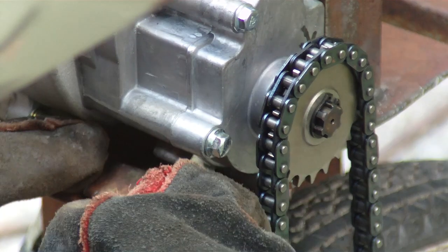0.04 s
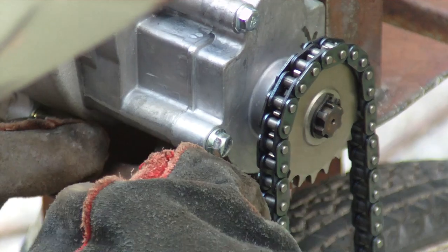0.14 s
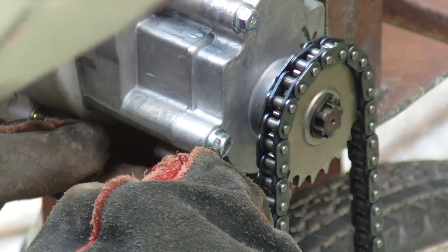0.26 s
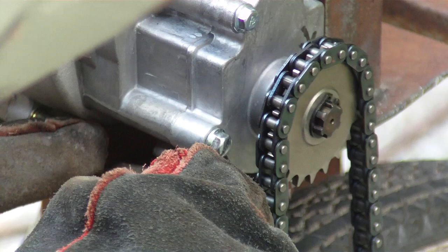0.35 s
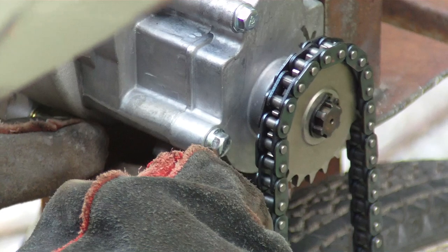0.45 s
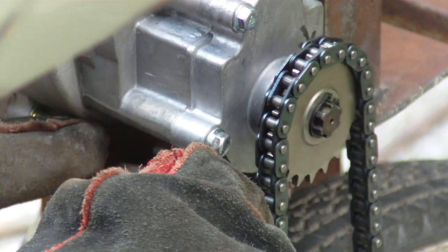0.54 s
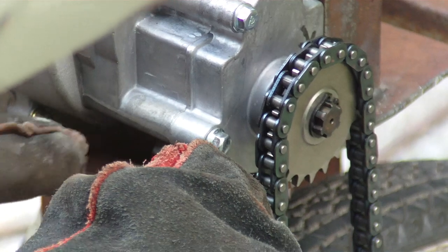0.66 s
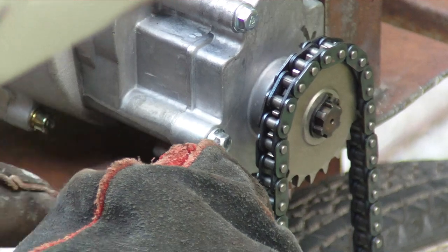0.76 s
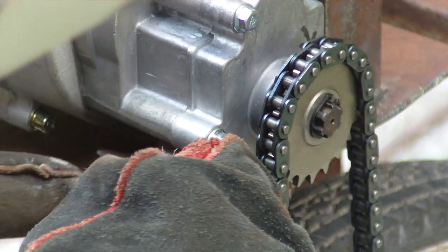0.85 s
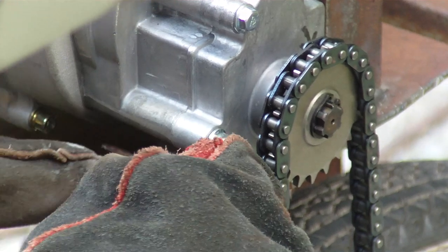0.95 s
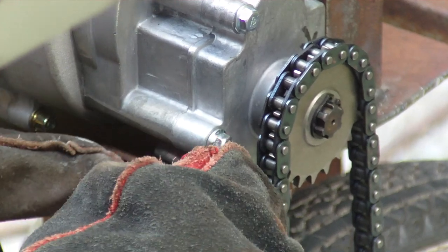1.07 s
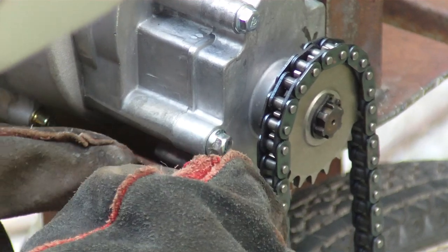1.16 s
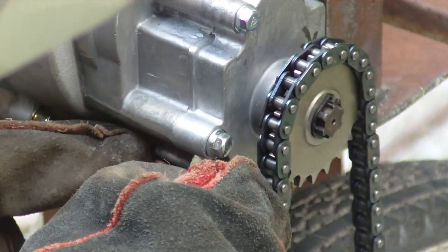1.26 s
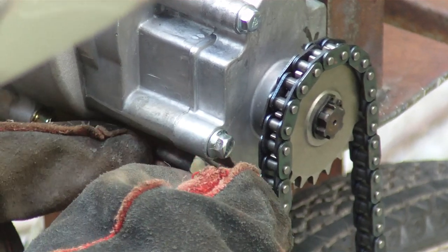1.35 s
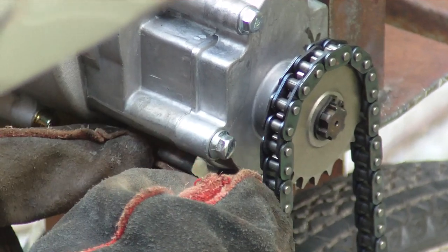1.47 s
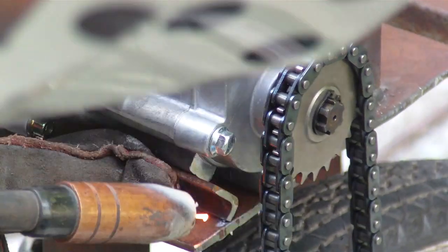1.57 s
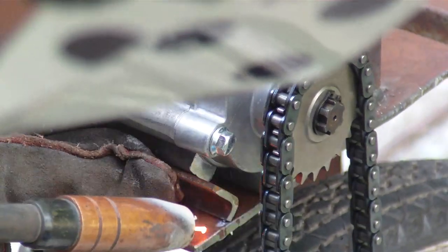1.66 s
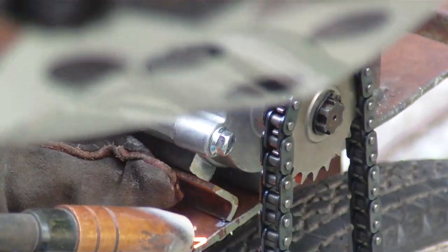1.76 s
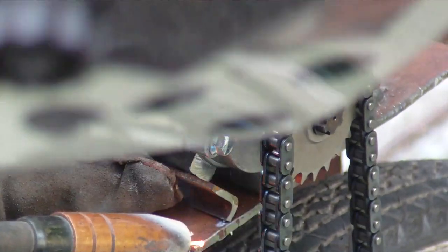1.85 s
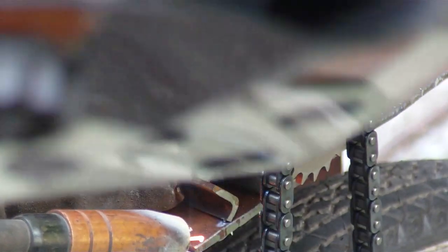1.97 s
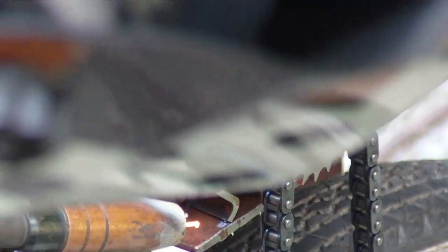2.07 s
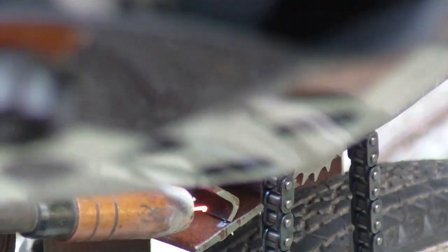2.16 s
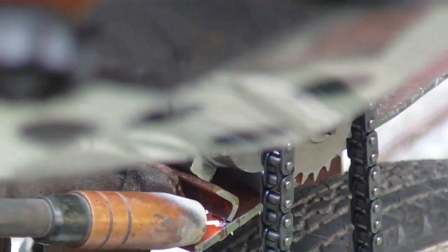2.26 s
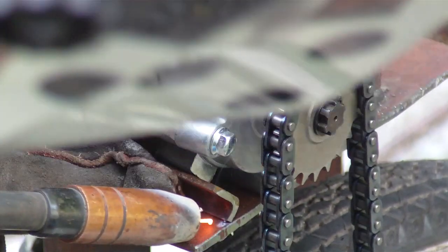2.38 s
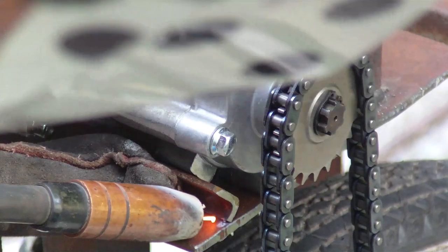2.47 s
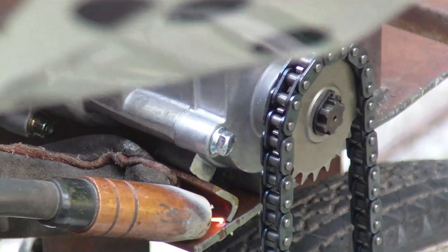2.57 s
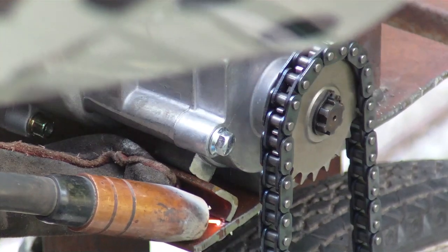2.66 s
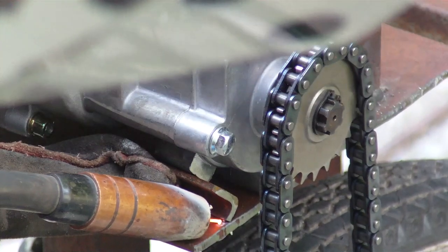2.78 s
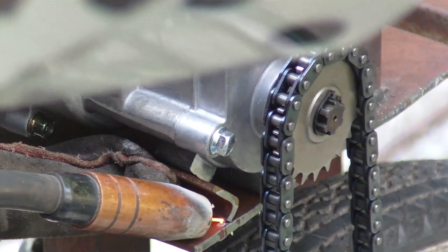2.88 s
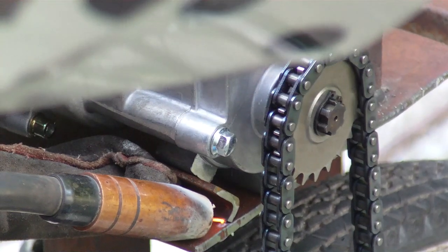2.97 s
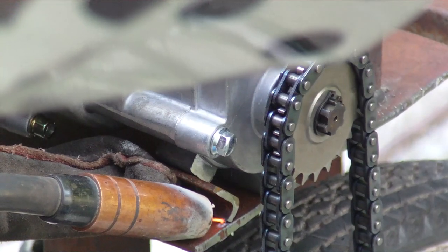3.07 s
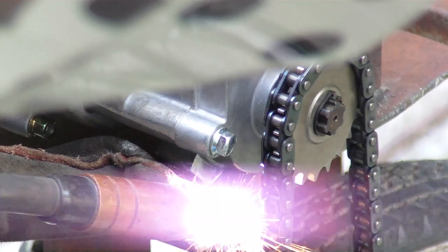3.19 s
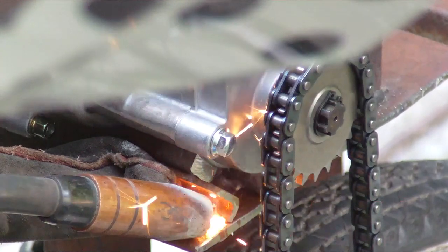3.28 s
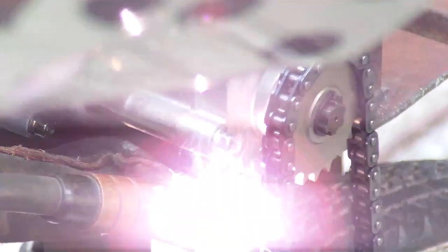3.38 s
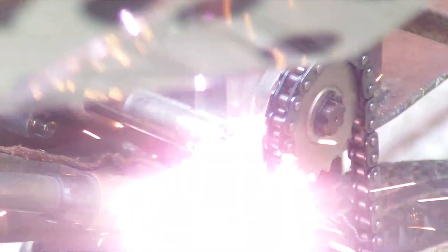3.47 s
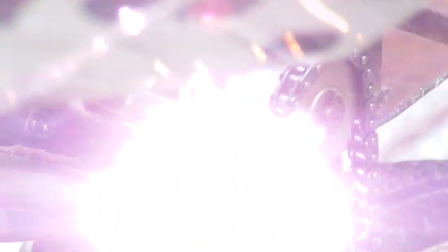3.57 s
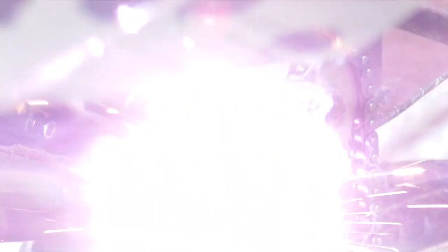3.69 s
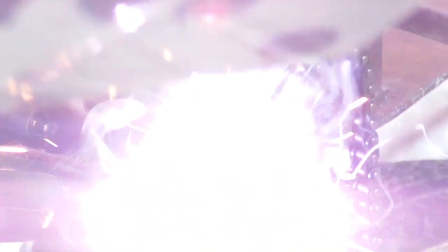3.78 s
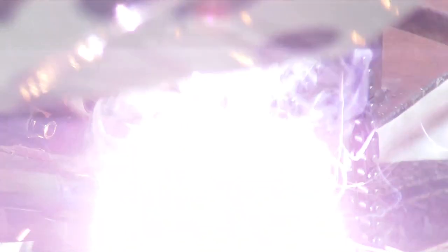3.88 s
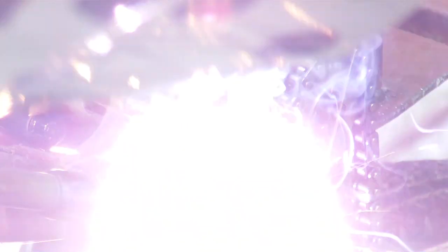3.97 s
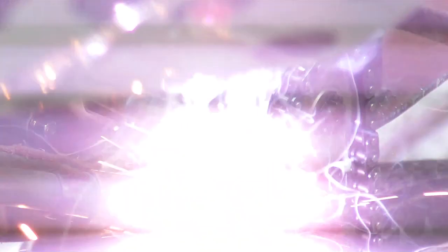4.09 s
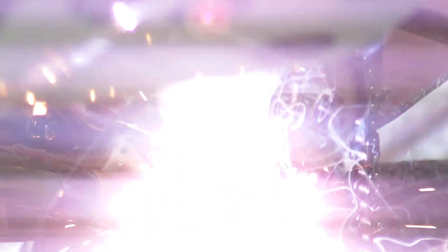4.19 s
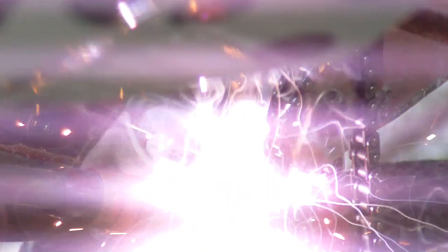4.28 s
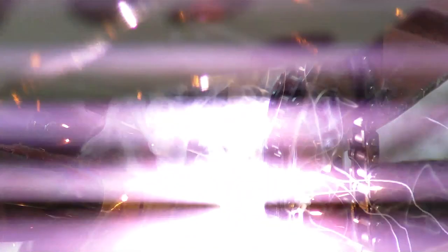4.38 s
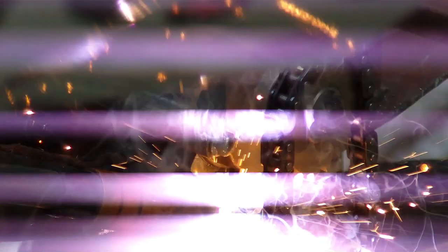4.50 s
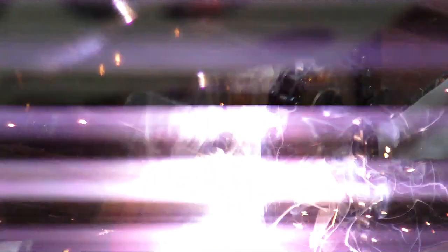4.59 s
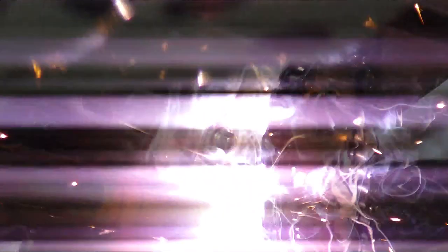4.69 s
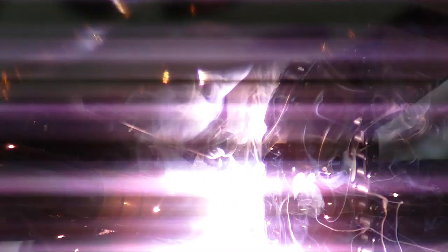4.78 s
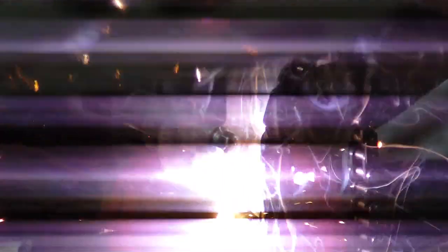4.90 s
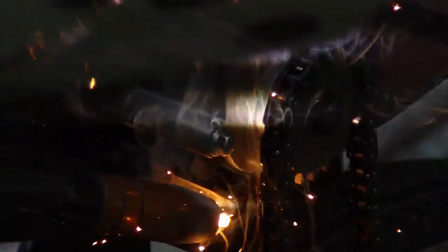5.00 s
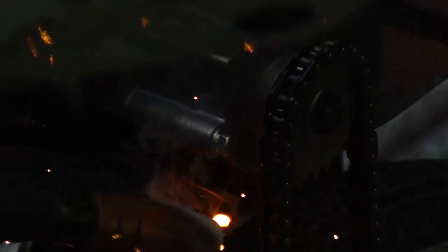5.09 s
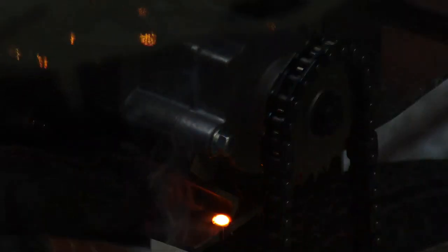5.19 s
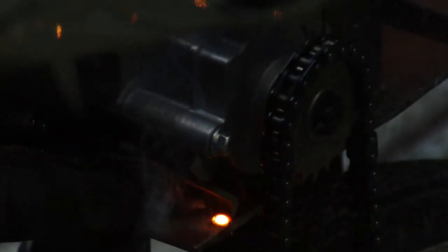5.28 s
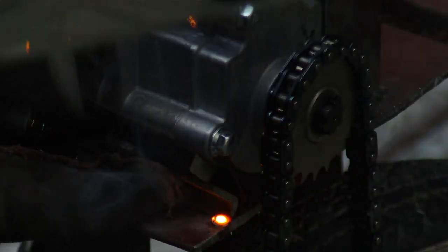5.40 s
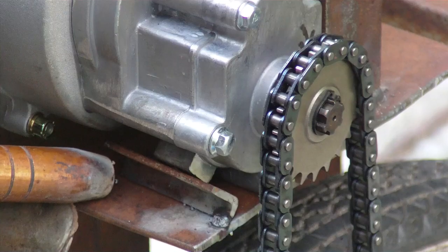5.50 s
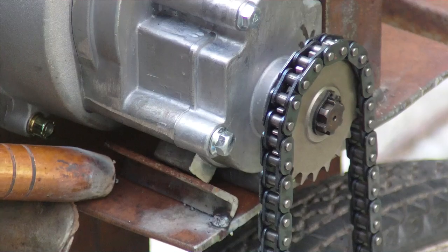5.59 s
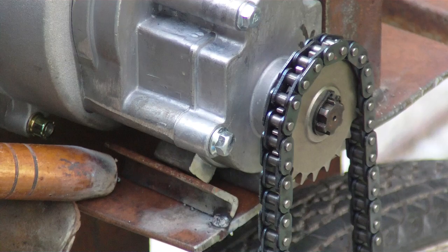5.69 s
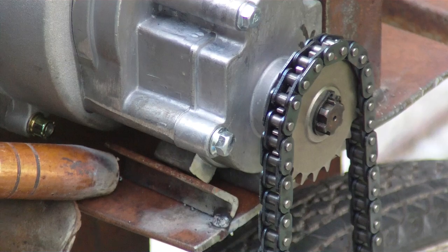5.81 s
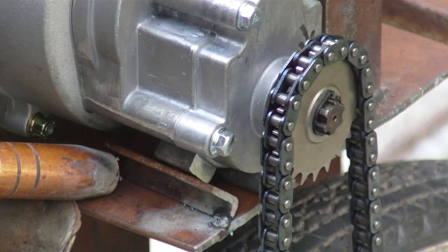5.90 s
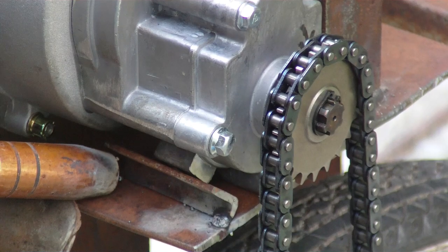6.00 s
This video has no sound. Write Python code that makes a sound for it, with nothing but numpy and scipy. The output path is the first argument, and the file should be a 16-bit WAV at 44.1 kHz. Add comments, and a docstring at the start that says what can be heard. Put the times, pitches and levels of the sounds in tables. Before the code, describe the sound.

A quiet workshop open to the outside: soft air, faint machine and fan hum, one insect's high, rapid chirping and the thin buzz of others farther off. At about 0.9 seconds steel hits steel nearby with one bright, short clink. Between 2.2 and 2.8 seconds a welding torch taps and brushes the work, with one sharper knock at 2.3. Around 3.3 seconds the wire feed gives a faint, dull shudder and sparks spit with a sharp snap. The arc lights weakly, pops, and catches fully at about 3.5 seconds. It is the loudest sound, a close, bright, buzzing sizzle dotted with irregular cracks of bursting molten drops, with a short room tail. At 5 seconds the arc dies quickly, leaving a few small spurts and faint frying as the weld cools. The chirping returns near 5.4 seconds and carries on over the hum until about 6 seconds.

```python
"""A wire-feed welder lays one short bead on a steel bracket, in a workshop open to the outside.
First the torch knocks on the work and struck steel rings with a bright clink. Then the feed shudders,
sparks spit and the arc catches: it sizzles in step with the mains, pops as molten drops short it out
and leaves the bead frying faintly as it cools. Underneath sit still air, machine hum, a fan that sags
under the load, one insect's chirping wing strokes and the thin buzz of others farther off."""
import sys
import numpy as np
from scipy import signal
from scipy.fft import rfft, irfft
from scipy.io import wavfile

SR = 44100
rng = np.random.default_rng(int(sys.argv[2]) if len(sys.argv) > 2 else 0)


def to_wav(sig):
    """Store sig (one row per channel, or 1-D mono) as 16-bit WAV at the path in sys.argv[1].

    Samples outside -1..1 are clipped; the rate is SR.
    """
    pcm = np.clip(np.atleast_2d(sig), -1, 1) * 32767
    pcm = np.round(pcm).astype(np.int16)
    wavfile.write(sys.argv[1], SR, pcm.T)  # frames by channels


N = 266805
TIME = np.arange(N) / SR

# bed of still air, near and far: (frequency [Hz], relative level [dB])
AIR_COLOUR = [(20, 3.5), (60, -10), (160, -17.5), (255, -6), (380, -16), (500, -4.5), (640, -12.5),
              (2000, -19.5), (4200, -24), (5500, -21), (6600, -25), (8000, -16.5), (9500, -26),
              (16000, -27)]
# partials of the machine hum: (frequency [Hz], level [dB])
HUM_PARTIALS = [(334, -79.5), (536, -81.5), (668, -82), (1003, -84.5), (1336, -84)]
# bouts of chirping: (start [s], end [s], pitch [Hz], level [dB])
CHIRP_BOUTS = [(0, 1.418, 7450, -65), (1.5, 2.85, 7370, -70), (5.396, 6.05, 7500, -65)]
# the torch tapping and brushing the work: (time [s], level [dB], t60 [s], brightness [dB/octave])
TORCH_KNOCKS = [(0.144, -52.5, .088, -7.5), (2.23, -62, .048, -11), (2.309, -34, .038, -4.5),
                (2.445, -55.5, .13, -8), (2.545, -58, .056, -12), (2.575, -58.5, .38, -10.5),
                (2.802, -63, .06, -11)]
# ring of the torch nozzle: (frequency [Hz], relative level [dB], t60 [s])
NOZZLE_MODES = [(1460, -11, .045), (2900, -3, .02), (3100, 1, .022), (3140, -23, .14), (4204, -8, .045),
                (5400, -10, .06), (5800, -7, .035), (6245, -22, .13), (6918, -21, .11)]
# thud of any contact: (frequency [Hz], relative level [dB])
THUD_COLOUR = [(100, -38), (800, -20), (1450, -12.5), (2000, -9.5), (2900, -9), (3700, -7), (4500, 2.5),
               (6400, 2.5), (8000, -3.5), (11000, -9.5), (16000, -31)]
# steel hitting steel: (time [s], thud level [dB], thud t60 [s], brightness [dB/octave], ring level [dB])
STEEL_HIT = (.8655, -17.5, .055, 1.0, -24.5)
# ring of the struck steel: (frequency [Hz], relative level [dB], t60 [s])
CLINK_MODES = [(1150, -22, .06), (1820, -18, .06), (2545, -9, .08), (3440, -14, .19), (3510, -15, .12),
               (4370, -14, .06), (5210, -1, .085), (5350, -1, .08), (5860, -3, .06), (6200, -4, .06),
               (6290, -14, .19), (6900, -12, .09), (7240, 0, .065), (7370, 0, .07), (8380, -11, .05),
               (8990, -10, .05), (9528, -14, .18), (11000, -14, .05)]
# sparks as the wire touches and as the bead cools: (time [s], level [dB], t60 [s])
SPARK_SPURTS = [(3.2574, -35.5, 0.068), (3.2867, -26, 0.026), (3.3322, -6, .0025), (3.3353, -32, 0.029),
                (5.101, -37.5, 0.034), (5.163, -45, 0.023), (5.2, -51.5, .06), (5.232, -51.5, 0.14),
                (5.389, -56, 0.062)]
# bright hiss of the sparks: (frequency [Hz], relative level [dB])
SPARK_COLOUR = [(100, -15.5), (1000, -8.5), (3000, -5), (6000, -4.5), (9000, 5), (12000, 3), (16000, -17.5)]
# dull body of the wire feed: (frequency [Hz], relative level [dB])
FEED_COLOUR = [(100, -24), (190, -7), (235, 5.5), (400, -10.5), (1000, -10), (3000, -19), (8000, -29)]
# featured drops bursting in the arc: (time [s], relative level [dB], thump offset [dB])
BIG_DROPS = [(3.3325, -14, 5), (3.4649, -1, -1), (3.5064, -17.5, 6), (3.5534, -12, -12), (3.5627, -8.5, 6),
             (3.5967, -5, 10.5), (3.6539, -5.5, 7.5), (3.7298, -12, -12), (3.756, -7.5, 10),
             (3.7804, -7.5, 8), (3.8046, -7, 8.5), (3.9053, -7.5, 0), (3.9792, -5.5, 10.5), (4.0458, -5, 2),
             (4.1062, -8.5, -1), (4.1222, -3.5, -3), (4.1892, -14, 1), (4.1966, -4.5, 9.5),
             (4.2624, -10, -16), (4.2891, -4.5, 10.5), (4.4461, -12.5, 6.5), (4.5813, -14, 11),
             (4.6137, -12.5, -14), (4.6808, -4, 10.5), (4.7222, -9, -17), (4.7471, -15, -2),
             (4.7642, -20, 11.5), (4.7886, -9, -18), (4.8385, -8, -15), (4.8733, -4, 3), (5.0481, -20.5, 7)]
# crack of a bursting drop: (frequency [Hz], relative level [dB])
CRACK_COLOUR = [(100, -21.5), (1200, -11), (3300, -12.5), (4400, -3.5), (5900, 0.5), (7400, -6), (9000, -4),
                (11000, -7.5), (13000, -5), (16000, -5)]
# ring of the steel around the arc: (frequency [Hz], relative level [dB], t60 [s])
BRACKET_MODES = [(640, -55, .05), (890, -60, .05), (1885, -45, .06), (4469, -54, .12), (4733, -55, .13),
                 (5007, -55, .12), (5978, -53, .1), (6911, -57, .13), (8437, -52, .09), (9135, -55, .13),
                 (10185, -55, .1), (13333, -56, .1)]
# level ride of the burning arc: (time [s], relative level [dB])
ARC_RIDE = [(3.57, -23.5), (3.79, -24), (3.84, -27), (4.26, -22), (4.42, -30.5), (4.6, -24.5),
            (4.65, -28.5), (4.72, -22.5), (4.91, -30), (4.95, -23), (5.01, -26)]
# sizzle of the arc: (frequency [Hz], relative level [dB])
SIZZLE_COLOUR = [(30, -21), (200, -31), (700, -15.5), (1300, -17.5), (2300, -10.5), (3500, -13),
                 (4300, -3.5), (5900, 0), (6900, -7), (7800, -7.5), (8800, -3), (11300, -11), (13500, -6.5),
                 (16000, -21)]

MAINS_HZ = 60
# cues: the wire starts, a weak arc lights, it catches fully, it is let go
WIRE_S, LIGHT_S, CATCH_S, OFF_S = 3.26, 3.39, 3.548, 5.02


def from_db(db):
    return 10 ** (np.asarray(db) / 20)


def unit_rms(x):
    return x / np.sqrt(np.mean(x ** 2) + 1e-20)


def drift(per_s):
    """A random wobble of unit RMS, gliding to per_s new values a second."""
    knots = rng.standard_normal(2048)
    return unit_rms(np.interp(TIME * per_s, np.arange(len(knots)), knots))


def decay(start, t60):
    """A hard attack that dies away."""
    return (TIME >= start) * 1000 ** (-np.maximum(TIME - start, 0) / t60)


def gate(start, end, attack, release):
    """Fades in from the start, holds at 1 and fades out after the end."""
    return np.clip(np.minimum((TIME - start) / attack, 1 - (TIME - end) / release), 0, 1)


def tone(hz, db, waver):
    """A sine whose pitch and level wander a little."""
    phase = 2 * np.pi * np.cumsum(hz * (1 + waver * drift(25))) / SR
    return np.sqrt(2) * from_db(db) * np.sin(phase) * from_db(2 * drift(9))


def colour(x, curve, tilt_db=0, size=8192):
    """Minimum-phase EQ along a curve, tilted by tilt_db per octave; white noise keeps its power."""
    hz, db = np.transpose(curve)
    octave = np.log2(np.maximum(np.fft.rfftfreq(size, 1 / SR), hz[0]))
    gain = unit_rms(from_db(np.interp(octave, np.log2(hz), db) + tilt_db * octave))
    cepstrum = irfft(np.log(gain))
    cepstrum[1:size // 2] *= 2
    cepstrum[size // 2 + 1:] = 0
    return signal.fftconvolve(x, irfft(np.exp(rfft(cepstrum))))[:N]


def ring(drive, modes):
    """Ringing metal: each mode is a damped resonator with its own level."""
    out = np.zeros(N)
    for k, (hz, db, t60) in enumerate(modes):
        radius, angle = 1000 ** (-1 / (t60 * SR)), 2 * np.pi * hz / SR
        poles = [1, -2 * radius * np.cos(angle), radius ** 2]
        out += (-1) ** k * from_db(db) * signal.lfilter([0, np.sin(angle)], poles, drive + 1e-18)
    return out


def echoes(x, level_db, t60, per_s):
    """A tail of scattered reflections, from surfaces too small to return the bass."""
    taps = rng.standard_normal(N) * (rng.random(N) < per_s / SR) * decay(.0006, t60)
    taps = signal.lfilter(*signal.butter(1, 1200, "high", fs=SR), taps[:SR])
    taps /= np.sqrt(np.sum(taps ** 2) + 1e-20)
    return from_db(level_db) * signal.fftconvolve(x, taps)[:N]


def still_air(level_db=-61):
    """A soft, dark bed of noise."""
    return from_db(level_db) * colour(rng.standard_normal(N), AIR_COLOUR)


def cooling_fan(blade_hz=267, idle_db=-73, sag_hz=34, load_db=4.5):
    """The blade tone sinks and swells while the welder draws current, then recovers."""
    load = gate(WIRE_S, OFF_S, attack=.03, release=.51)
    return tone(blade_hz - sag_hz * load, idle_db + load_db * np.sqrt(load), waver=.00613)


def machine_hum():
    """A steady drone of a few faint partials."""
    return sum(tone(hz, db, waver=.0022) for hz, db in HUM_PARTIALS)


def insect(chirps_per_s=17, pitch_fall=.0444, fade_s=.046):
    """Every wing stroke is a short raspy note that falls in pitch."""
    stroke = np.cumsum(chirps_per_s * (1 + .052 * drift(.82))) / SR % 1
    rasp = 1 + .01 * drift(900)
    swell = np.sin(np.pi * stroke) ** 4
    bend = rasp * (1 - pitch_fall * (stroke - .5))
    return swell * sum(gate(start, end, fade_s, fade_s) * tone(hz * bend, db, waver=.0012)
                       for start, end, hz, db in CHIRP_BOUTS)


def far_insects(pitch_hz=5640, level_db=-78.5, rasp=.028):
    """Distant insects merge into one thin, unbroken buzz."""
    return tone(pitch_hz * (1 + rasp * drift(330)), level_db, waver=.0038)


def contact(start, thud_db, t60, tilt_db, ring_db, modes):
    """A short rattling thud with little bass, which leaves the metal ringing."""
    burst = from_db(thud_db) * decay(start, t60) * rng.standard_normal(N)
    thud = colour(burst, THUD_COLOUR, tilt_db)
    click = np.zeros(N)
    click[round(start * SR)] = from_db(ring_db)
    # the modes take the blow a moment apart, as it travels through the part
    ringing = sum(np.roll(ring(click, [mode]), rng.integers(SR // 800)) for mode in modes)
    return signal.sosfilt(signal.butter(2, 330, "high", fs=SR, output="sos"), thud + ringing)


def torch_knocks():
    """The torch is set on the work; a slow brush rings the nozzle less than a quick tap."""
    out = np.zeros(N)
    for start, db, t60, tilt_db in TORCH_KNOCKS:
        ring_db = db - 20 * np.log10(t60 / .057)
        out += contact(start, db, t60, tilt_db, ring_db, NOZZLE_MODES)
    return out


def steel_clink():
    """One steel part strikes another and rings brightly."""
    return contact(*STEEL_HIT, CLINK_MODES)


def sparks():
    """Each spurt of sparks is a quick burst of bright hiss."""
    spurts = sum(from_db(db) * decay(start, t60) for start, db, t60 in SPARK_SPURTS)
    return colour(spurts * rng.standard_normal(N), SPARK_COLOUR)


def wire_feed(level_db=-54, attack_s=.009, hold_s=.03, release_s=.066):
    """A short, dull shudder as the wire is pushed out."""
    shudder = gate(WIRE_S, WIRE_S + attack_s + hold_s, attack_s, release_s)
    return from_db(level_db) * shudder * colour(rng.standard_normal(N), FEED_COLOUR)


def drop_pops(crack_db=12.5, spatter_db=-11, spatter_t60=.0088, thump_db=-1, thump_hz=1300):
    """Each drop bursts with one crack and a spray of spatter; the heated air adds a thump."""
    times, db, thump_offset_db = np.vstack([BIG_DROPS, small_drops()]).T
    at = np.round(times * SR).astype(int)
    cracks, thumps = np.zeros((2, N))
    cracks[at] = from_db(db + crack_db)
    thumps[at] = from_db(db + thump_offset_db + thump_db)
    tail = decay(0, spatter_t60)[:SR // 10]
    spray = signal.fftconvolve(cracks, tail / np.sqrt(np.sum(tail ** 2)))[:N]
    spatter = from_db(spatter_db) * spray * rng.standard_normal(N)
    return cracks + spatter, signal.lfilter(*signal.butter(2, thump_hz, fs=SR), thumps + 1e-18)


def arc_envelope(weak_db=-13.5, light_rise_s=.043, catch_rise_s=.024, cooling_db=-51.5):
    """The arc lights weakly, catches, burns and dies quickly; the hot bead fries on as it cools."""
    weak = from_db(weak_db) * gate(LIGHT_S, CATCH_S, light_rise_s, catch_rise_s)
    catch = np.clip((TIME - CATCH_S) / catch_rise_s, 0, 1)
    burn = (TIME < OFF_S) + decay(OFF_S, t60=.17)
    cooling = from_db(cooling_db) * decay(OFF_S, t60=1.48)
    ride = from_db(np.interp(TIME, *np.transpose(ARC_RIDE)))
    return ride * (weak + catch * burn) + cooling


def sizzle(trim_db=-3.5, uneven_db=5, spit_t60=.0094, swing_db=2.5, grain_db=3.5, grains_per_s=7000):
    """The arc spits near each crest of the rectified current, never twice alike, and fizzes between."""
    half_cycles = 2 * MAINS_HZ * TIME
    crest, scatter = .68, .13  # fractions of a half cycle
    late, strength = np.clip(rng.standard_normal((int(half_cycles[-1]) - 1, 2)), -2, 2).T
    at = (np.arange(len(late)) + crest + scatter * late) * SR / (2 * MAINS_HZ)
    clicks = np.zeros(N)
    clicks[at.astype(int)] = from_db(uneven_db * strength)
    spits = signal.lfilter([1], [1, -1000 ** (-1 / (spit_t60 * SR))], clicks)
    fizz = .245 * from_db(swing_db * np.cos(2 * np.pi * (half_cycles - crest)))
    # both are made of countless tiny bursts of uneven size
    grains = (rng.random(N) < grains_per_s / SR) * rng.choice([-1, 1], N)
    sizes = from_db(grain_db * np.minimum(rng.exponential(1, N), 4))
    return from_db(trim_db) * arc_envelope() * unit_rms((spits + fizz) * grains * sizes)


def small_drops(per_s=17, over_ride_db=6, spread_db=1, thump_spread_db=5):
    """Lesser drops burst at random, following the arc's level; columns as in BIG_DROPS."""
    wait, softness, thump = np.clip(rng.standard_normal((200, 3)), -2, 2).T
    times = CATCH_S + np.cumsum(np.exp(.5 * wait)) / per_s
    db = np.interp(times, *np.transpose(ARC_RIDE)) + over_ride_db - spread_db * softness
    return np.column_stack([times, db, thump_spread_db * thump])[times < OFF_S]


def weld(ring_db=1.5):
    """Sparks over an arc in a nook of steel: the bracket rings and nearby metal throws the arc back."""
    cracks, thumps = drop_pops()
    frying = sizzle()
    bracket = from_db(ring_db) * ring(frying + cracks, BRACKET_MODES)
    arc = colour(frying, SIZZLE_COLOUR) + colour(cracks, CRACK_COLOUR) + thumps + bracket
    return arc + sparks() + echoes(arc, level_db=-9, t60=.036, per_s=4800)


def scene():
    """The work up front with a short room tail, over a quiet bed of air, machines and insects."""
    work = weld() + steel_clink() + torch_knocks() + wire_feed()
    air = still_air()
    room = echoes(work, level_db=-20, t60=.36, per_s=3200)
    bed = air + cooling_fan() + machine_hum() + insect() + far_insects()
    return (work + room + bed)[None]


def record(dry, ceiling=.9, cutoff_hz=15850):
    """The loudest cracks clip, and a steep low-pass takes off the very top."""
    low_pass = signal.ellip(10, .2, 70, cutoff_hz, fs=SR, output="sos")
    return signal.sosfilt(low_pass, np.clip(dry, -ceiling, ceiling))


dry = scene()
out = record(dry)
to_wav(out)
```